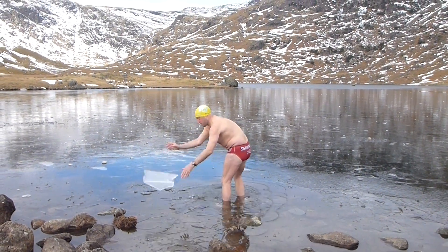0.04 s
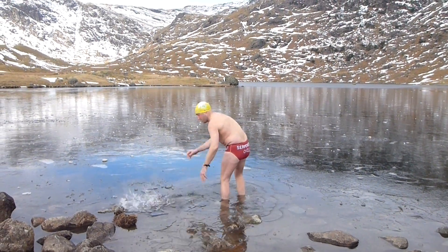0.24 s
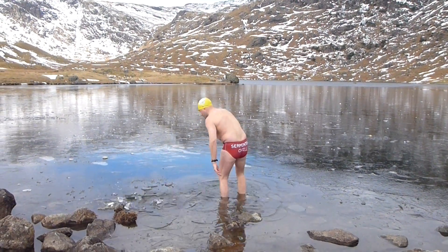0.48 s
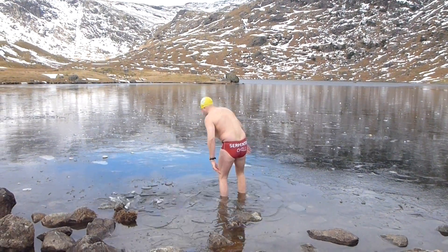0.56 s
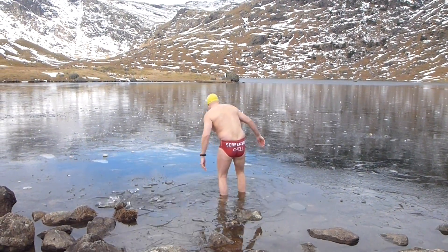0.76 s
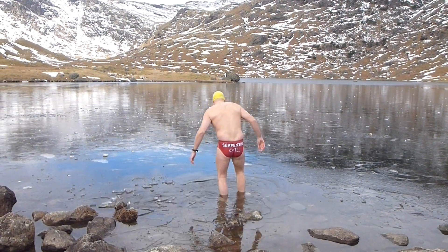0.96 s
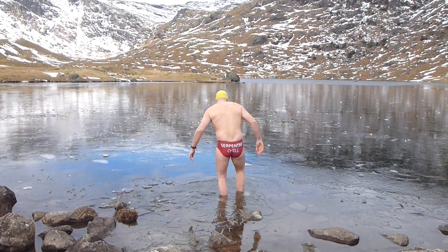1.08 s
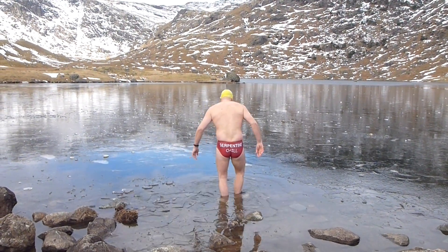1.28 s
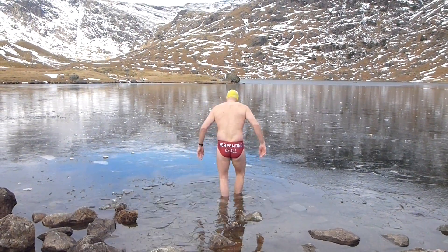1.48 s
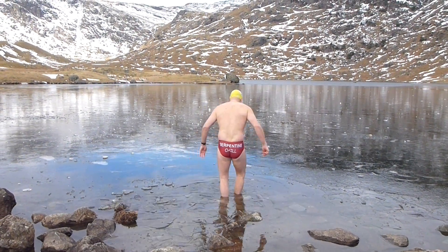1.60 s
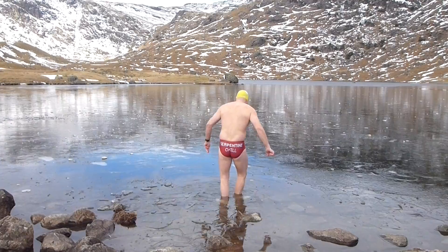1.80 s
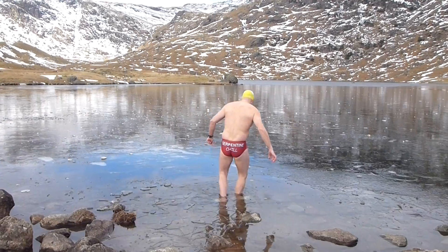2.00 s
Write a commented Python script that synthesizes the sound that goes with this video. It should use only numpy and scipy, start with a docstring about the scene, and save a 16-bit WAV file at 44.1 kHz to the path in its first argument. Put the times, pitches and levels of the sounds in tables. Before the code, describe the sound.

Ice breaks with a sharp, brittle crash at a lake shore, preceded by a short slipping squeak. Fragments patter and ring while water bubbles briefly, then only a quiet outdoor wash and soft wind buffeting the microphone remain.

```python
"""A sheet of ice shatters on the frozen shallows of a lake, after squeaking out of wet fingers.
Brittle fracture radiates bursts of clicks and excites the bending modes of the sheet. Shards tick
and ring on the ice, crumbs patter, and bubbles resonate in a small splash. The shore scatters back
a weak tail. A steady open-air wash lies underneath, and wind eddies bump the microphone."""
import sys
import numpy as np
from scipy import signal
from scipy.io import wavfile
from scipy.ndimage import uniform_filter1d

SR = 44100
rng = np.random.default_rng(int(sys.argv[2]) if len(sys.argv) > 2 else 0)


def file_out(sig):
    """Save sig as 16-bit WAV at sys.argv[1]."""
    # one column per channel
    cols = np.atleast_2d(sig).T
    # limit, then scale
    lim = np.clip(cols, -1, 1)
    pcm = np.round(lim * 32767).astype(np.int16)
    wavfile.write(sys.argv[1], SR, pcm)


N = 90404


def amp(db):
    """Amplitude ratio of a level in decibels."""
    return 10 ** (np.asarray(db) / 20)


def unit(x):
    """Normalisation to rms 1."""
    return x / np.sqrt(np.mean(x ** 2) + 1e-20)


def decay(t, t60):
    """Exponential damping: 60 dB down after t60 seconds."""
    return np.exp(-np.log(1000) * t / t60)


def read(points, hz):
    """Interpolation of a table on a logarithmic frequency axis."""
    f, value = np.transpose(points)
    return np.interp(np.log(hz + 1), np.log(f + 1), value)


def add(mix, start, sound):
    """Superposition of a sound from a start time in seconds."""
    part = mix[max(round(start * SR), 0):][:len(sound)]
    part += sound[:len(part)]


def minimum_phase(x, curve_db, size=4096):
    """Causal filter of unit mean power; its phase is the Hilbert transform of its log gain."""
    log_gain = np.log(amp(curve_db(abs(np.fft.fftfreq(size, 1 / SR)))))
    taps = np.fft.ifft(np.exp(np.conj(signal.hilbert(log_gain)))).real[:size // 2]
    return signal.oaconvolve(x, taps / np.linalg.norm(taps))[:len(x)]


def colour(x, spectrum):
    """Source-filter model: an excitation takes on a tabulated spectrum, at rms 1."""
    return unit(minimum_phase(x, lambda hz: read(spectrum, hz)))


def clicks(per_s, spread_db, size):
    """Shot noise: independent impulses of uneven strength, at rms 1."""
    chance, sign, draw = rng.random((3, size))
    strength = amp(-spread_db * np.log(draw + np.exp(-4)))
    return unit((chance < per_s / SR) * np.sign(sign - .5) * strength)


def wobble(size, span):
    """Low-pass fluctuation: noise averaged twice over span samples, at rms 1."""
    return unit(uniform_filter1d(uniform_filter1d(rng.standard_normal(size), span), span))


def burst(spectrum, hold_s, t60, attack_s=0.00027, size=8192):
    """Acoustic emission: a run of tiny fractures starts sharply, holds and dies."""
    t = np.arange(size) / SR
    envelope = np.minimum(t / attack_s, 1) * decay(np.maximum(t - hold_s, 0), t60)
    fractures = envelope * clicks(per_s=9000, spread_db=3, size=size)
    return colour(fractures, spectrum) * np.sqrt(np.mean(envelope ** 2))


def ring(hz, t60, chirp=0, attack_s=0):
    """Damped oscillation of one mode; a positive chirp raises its pitch."""
    t = np.arange(12000) / SR
    onset = np.minimum(t / attack_s, 1) if attack_s else 1
    return onset * np.sin(2 * np.pi * hz * t * (1 + chirp * t)) * decay(t, t60)


# Spectrum of the open air: f/Hz, level/dB
AIR_SPECTRUM = [(20, -17), (40, -8), (75, -1.5), (150, -4.5), (290, -3.5), (480, -5), (800, -8.5),
                (1200, -10), (2000, -15), (3300, -19.5), (5000, -22.5), (8000, -26.5), (11000, -31),
                (15500, -34)]

def air(level_db=-46, patch_db=1.52):
    """Incoherent sources, distant wind and water, sum to a wash with faint drifting patches."""
    hz = np.fft.rfftfreq(1024, 1 / SR)
    real, imag, patches = rng.standard_normal((3, len(hz), N // 256 + 5))
    patches = unit(uniform_filter1d(uniform_filter1d(patches, size=14, axis=0), size=10, axis=1))
    spectra = (real + 1j * imag) * amp(read(AIR_SPECTRUM, hz)[:, None] + patch_db * patches)
    return amp(level_db) * unit(signal.istft(spectra, nperseg=1024, noverlap=768)[1][:N])


# Eddies at the microphone: t/s, level/dB, f/Hz, half-width/s
EDDIES = [(0.017, -36, 69.4, 0.012), (.112, -36, 108, 0.009), (0.057, -44.5, 75, .02),
          (0.533, -51, 79.4, 0.015), (0.729, -47.5, 69.6, 0.048), (1.334, -38, 122, 0.022),
          (1.372, -36, 90, 0.0064), (1.405, -25, 155, 0.012), (1.407, -40.5, 66.3, 0.027),
          (1.451, -42, 99, 0.049), (1.674, -38.5, 116, 0.015), (1.7, -32, 138, 0.0077),
          (1.796, -39.5, 136, 0.02), (1.868, -41, 80.5, 0.017), (2.04, -34.5, 88, 0.0064)]
# Spectrum of their turbulence: f/Hz, level/dB
TURBULENCE_SPECTRUM = [(30, -9), (70, 3.5), (200, 1.5), (360, -3.5), (550, -20), (1200, -46.5)]

def wind(turbulence_db=-9):
    """Pseudo-sound: each eddy bumps the microphone with uneven, turbulent swings of pressure."""
    t, out = np.arange(N) / SR, np.zeros(N)
    turbulence = amp(turbulence_db) * colour(rng.standard_normal(N), TURBULENCE_SPECTRUM)
    phase_drift = 0.14 * wobble(N, span=500)
    for centre, db, hz, width in EDDIES:
        swing = np.sin(2 * np.pi * (hz * (t - centre) + rng.random() + phase_drift))
        out += amp(db) * np.exp(-((t - centre) / width) ** 2) * (swing + turbulence)
    return out


# Harmonics of the squeak, from the fundamental up: level/dB
SQUEAK_HARMONICS = [-41, -31.5, -47.5, -48.5, -51, -56]

def squeak(start_hz=708, end_hz=900, glide_start_s=0.0158, glide_s=.036, peak_s=0.041, jitter=0.019):
    """Stick-slip friction on wet skin, speeding up as the sheet leaves the fingers."""
    t = np.arange(N) / SR
    glide = np.clip((t - glide_start_s) / glide_s, 0, 1) ** 2
    hz = (start_hz + (end_hz - start_hz) * glide) * (1 + jitter * wobble(N, span=50))
    phase = 2 * np.pi * np.cumsum(hz) / SR
    width_s = np.where(t < peak_s, 0.018, 0.013)
    envelope = np.exp(-((t - peak_s) / width_s) ** 2)
    return envelope * sum(amp(db) * np.sin(k * phase) for k, db in enumerate(SQUEAK_HARMONICS, 1))


# Shard impacts: t/s, ring level/dB, f/Hz, T60/s, tick level/dB
SHARD_IMPACTS = [(.128, -46.5, 5540, 0.037, -40), (0.3149, -31.5, 1400, 0.064, -48),
                 (0.3485, -25, 1170, .04, -50), (0.359, -35, 1480, 0.034, -54),
                 (0.389, -35, 896, 0.059, -60), (.393, -36, 2120, 0.03, -55),
                 (0.407, -37, 1225, 0.035, -41.5), (0.4469, -36, 3190, .02, -39.5),
                 (0.4886, -39.5, 8540, 0.017, -40), (0.5013, -36, 2043, .035, -56),
                 (.5058, -45, 4520, 0.05, -47), (.538, -41, 1004, 0.097, -57),
                 (0.555, -44, 6540, 0.016, -50), (.566, -34.5, 1013, 0.042, -51),
                 (0.5829, -36, 1197, 0.047, -38.5), (.5845, -46, 6480, 0.018, -58),
                 (0.7757, -56, 2450, 0.016, -46.5), (.7927, -49, 4360, 0.025, -57),
                 (0.8415, -60, 3570, 0.022, -45.5)]
# Modes of a shard: frequency ratio, level/dB
SHARD_OVERTONES = [(1, 3), (0.92, -5.5), (1.6, -9), (.74, -6.5)]
# Spectrum of a contact tick: f/Hz, level/dB
TICK_SPECTRUM = [(500, -17), (2000, 15), (5000, 1), (9000, -8), (15000, 0)]

def shards():
    """Impact excitation: loose pieces tick on the ice and ring briefly as they chatter."""
    out = np.zeros(N)
    for start, ring_db, hz, t60, tick_db in SHARD_IMPACTS:
        add(out, start, amp(tick_db) * burst(TICK_SPECTRUM, hold_s=0, t60=0.025))
        for ratio, mode_db in SHARD_OVERTONES:
            tone = ring(min(hz * ratio, SR / 2), t60, attack_s=0.0012)
            chatter = unit(1 + wobble(len(tone), span=70))
            add(out, start + rng.random() * .001, amp(ring_db + mode_db) * tone * chatter)
    return out


# Blows of the sheet and its halves: t/s, hold/s, thud level/dB, crack level/dB, crackle level/dB
SHEET_BLOWS = [(0.2296, 0.0018, -25, -21.5, -21.5), (0.2331, 0.0055, -26, -11.5, -23.5),
               (0.2457, 0.0035, -19.5, -12, -20), (0.261, 0.0022, -29, -23, -32.5),
               (0.2768, 0.00076, -24, -10.5, -26), (0.2816, 0.0048, -24, -17, -27.5)]
# Low, middle and high spectra of a blow: f/Hz, level/dB
THUD_SPECTRUM = [(40, -45), (60, -28), (95, -19), (150, -3.5), (250, -1), (335, 3), (440, -7), (600, -11),
                 (1500, -64)]
CRACK_SPECTRUM = [(50, -57), (200, -27), (560, -10), (720, -1.5), (1000, 0.5), (1350, 1.5), (1650, -6.5),
                  (1950, -0.5), (2400, -5.5), (3000, -15), (4200, -30), (8000, -53.5)]
CRACKLE_SPECTRUM = [(100, -50), (1200, -23.5), (3200, 4), (3750, -3), (4300, 1.5), (5400, -3.5), (7000, -7),
                    (9000, -10.5), (10500, -15.5), (13000, -11.5), (15500, -10)]
# Bending modes of the sheet: f/Hz, level/dB, T60/s
SHEET_MODES = [(334, -20, 0.17), (501, -27, 0.29), (710, -26, 0.053), (970, -51, 0.074), (1168, -20, 0.076),
               (1288, -26.5, 0.12), (1370, -26, 0.098), (1526, -14.5, 0.14), (1750, -50, .08),
               (1850, -16, 0.13), (2030, -28, 0.13), (2343, -14.5, 0.046), (2730, -42, 0.067),
               (3480, -30.5, 0.099)]

def crash(struck_s=.233, scatter_s=0.001987):
    """Brittle fracture: each blow thuds, cracks and crackles; the sheet rings in free vibration."""
    out = np.zeros(N)
    for start, hold_s, thud_db, crack_db, crackle_db in SHEET_BLOWS:
        thud = amp(thud_db) * burst(THUD_SPECTRUM, hold_s, t60=.055)
        crack = amp(crack_db) * burst(CRACK_SPECTRUM, hold_s, t60=0.032)
        crackle = amp(crackle_db) * burst(CRACKLE_SPECTRUM, hold_s, t60=0.063)
        add(out, start, thud + crack + crackle)
    for hz, db, t60 in SHEET_MODES:
        add(out, struck_s + rng.random() * scatter_s, amp(db) * ring(hz, t60, attack_s=0.0023))
    return out


# Spectrum of falling crumbs and spray: f/Hz, level/dB
DEBRIS_SPECTRUM = [(50, -45), (200, -17), (600, -6), (900, 3.5), (1300, 0), (2200, -16), (3200, -18),
                   (6000, -25), (15000, -33)]

def debris(start_s=.29, level_db=-40, fall_db_per_s=63):
    """Shot noise of many small impacts: crumbs and spray patter down and die away."""
    t = np.arange(N) / SR - start_s
    patter = colour(clicks(per_s=1800, spread_db=2.5, size=N), DEBRIS_SPECTRUM)
    return patter * (t > 0) * amp(level_db - fall_db_per_s * t)


# Lone bubbles where water closes over shards: t/s, level/dB, f/Hz
PLOPS = [(.776, -32, 922), (.849, -40, 1098), (1.04, -41, 1025)]

def bubbles(splash_s=.3, spread_s=.3, low_hz=733, high_hz=2125, fall_db_per_s=45, t60=0.032, chirp=0.52):
    """Minnaert resonance of trapped air: a gurgling swarm, then lone plops, all rising in pitch."""
    out = np.zeros(N)
    for when, pitch, strength in rng.random((45, 3)):
        delay = spread_s * when ** 2
        hz = low_hz * (high_hz / low_hz) ** pitch
        gain = strength * amp(-34.5 - fall_db_per_s * delay)
        add(out, splash_s + delay, gain * ring(hz, t60, chirp))
    for start, db, hz in PLOPS:
        add(out, start, amp(db) * ring(hz, t60=0.058, chirp=chirp))
    return out


# Reverberation time of the shore: f/Hz, T60/s
SHORE_DECAY = [(150, 0.27), (500, 0.47), (1100, 0.42), (2500, 0.31), (6000, 0.3), (15000, 0.11)]

def shore(x, level_db=-18.5):
    """Diffuse scattering: rocks and ice return a weak tail, each band dying at its own rate."""
    reflections = clicks(per_s=4000, spread_db=1.2, size=SR)
    hz, t, spectra = signal.stft(reflections, SR, nperseg=256)
    tail = signal.istft(spectra * decay(t, read(SHORE_DECAY, hz)[:, None]), SR, nperseg=256)[1]
    return amp(level_db) * signal.fftconvolve(x, tail / np.linalg.norm(tail))[:N]


def scene():
    """Superposition of the ice and bubbles, their echo, the debris and the open air."""
    direct = squeak() + crash() + shards() + bubbles()
    return (direct + shore(direct) + debris() + wind() + air())[None]


# Narrow dips in the microphone's response: f/Hz, half-width/Hz, level/dB
MICROPHONE_DIPS = [(2887, 103, -12), (7850, 140, -4), (11680, 365, -13)]

def record(dry, low_cut_hz=34, high_cut_hz=15880, knee=0.55, headroom=.25):
    """Transduction: an uneven, band-limited microphone saturates softly above the knee."""
    def response_db(hz):
        return sum(db * np.exp(-((hz - centre) / width) ** 2) for centre, width, db in MICROPHONE_DIPS)

    heard = minimum_phase(dry[0], response_db)
    heard = signal.sosfilt(signal.butter(2, low_cut_hz, "highpass", fs=SR, output="sos"), heard)
    excess = np.maximum(abs(heard) - knee, 0)
    heard += np.sign(heard) * (headroom * np.tanh(excess / headroom) - excess)
    low_pass = signal.firwin(511, high_cut_hz, window=("kaiser", 9), fs=SR)
    return signal.oaconvolve(heard, low_pass, "same")[None]


dry = scene()
out = record(dry)
file_out(out)
```